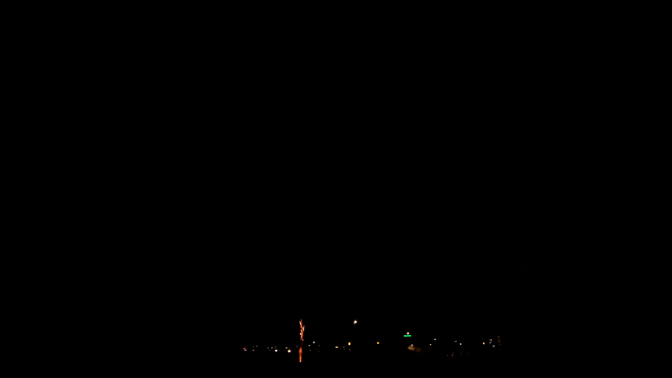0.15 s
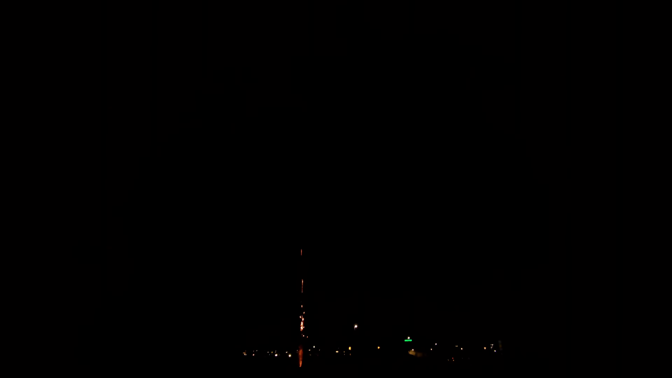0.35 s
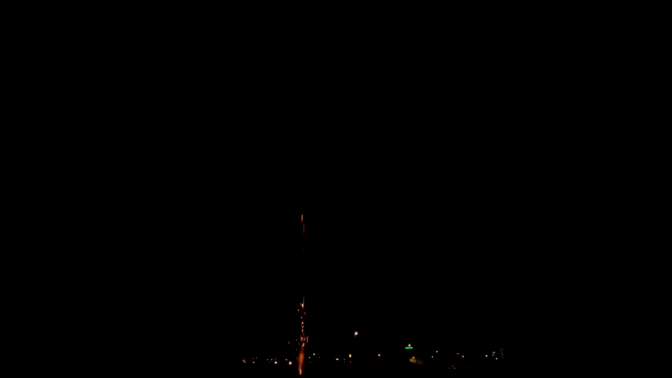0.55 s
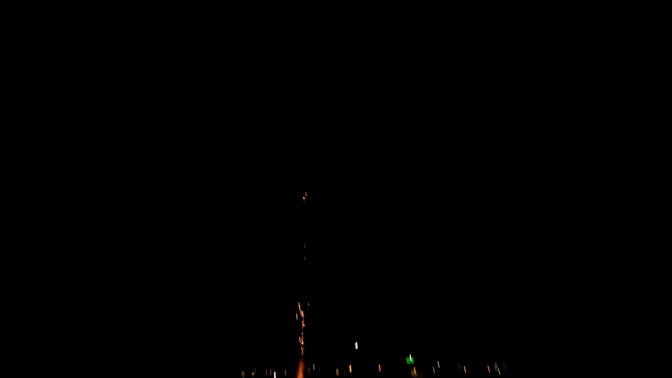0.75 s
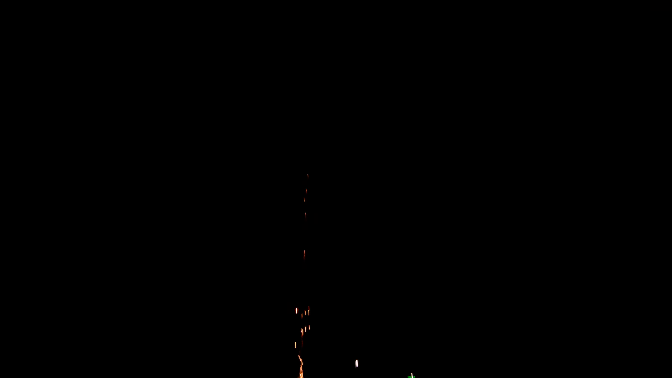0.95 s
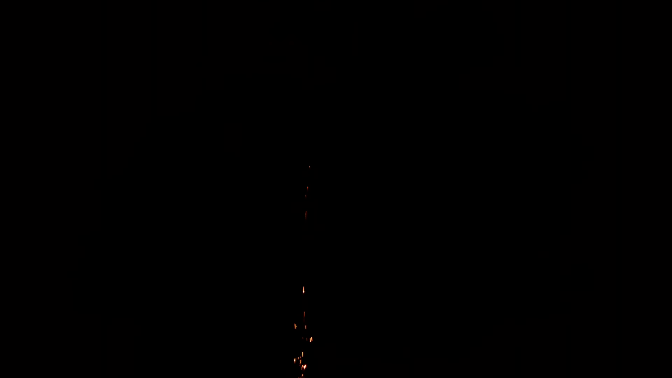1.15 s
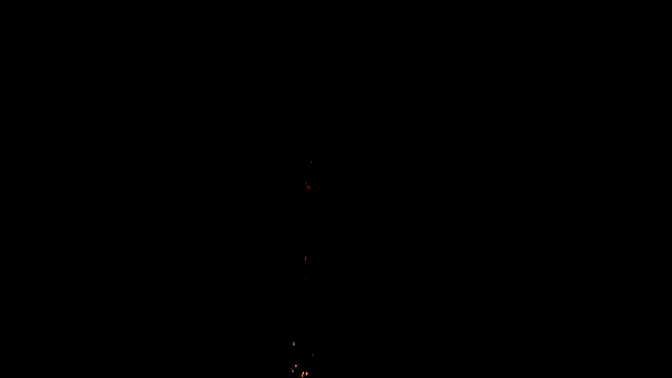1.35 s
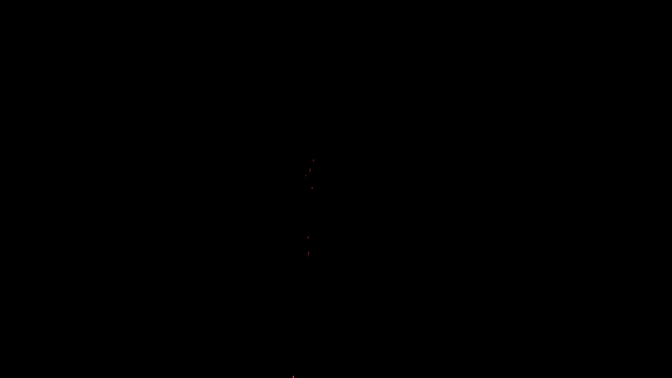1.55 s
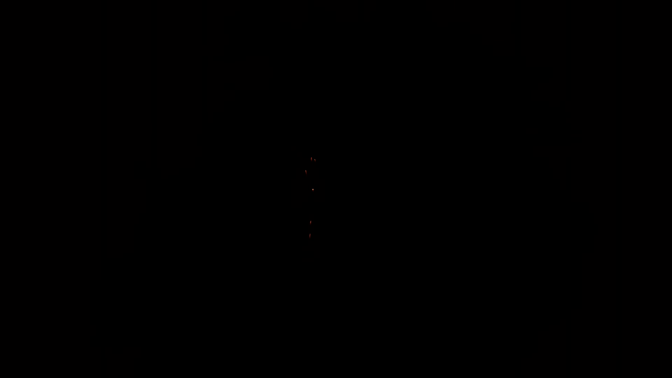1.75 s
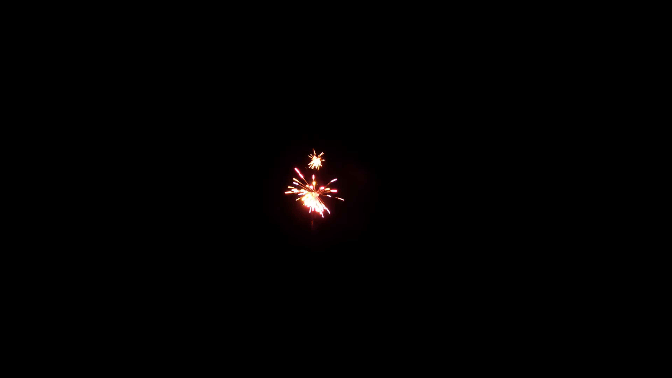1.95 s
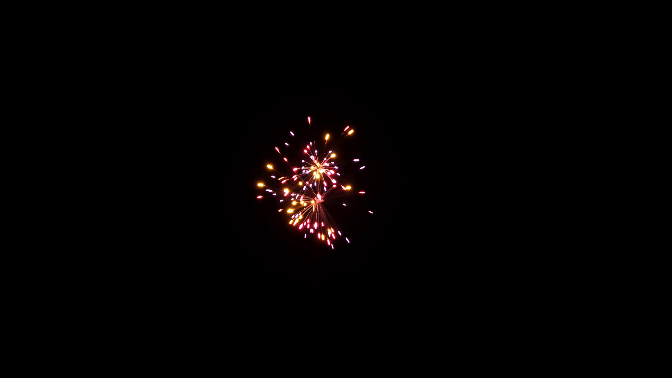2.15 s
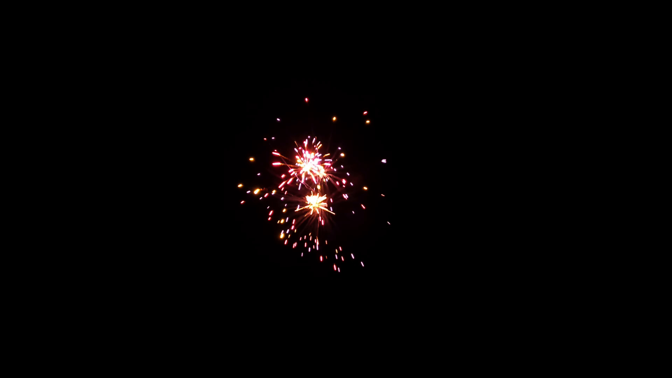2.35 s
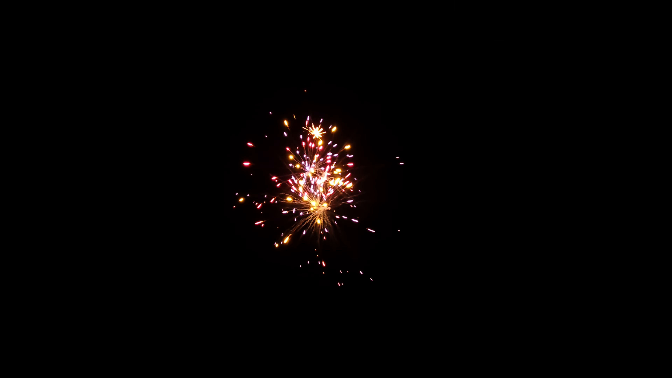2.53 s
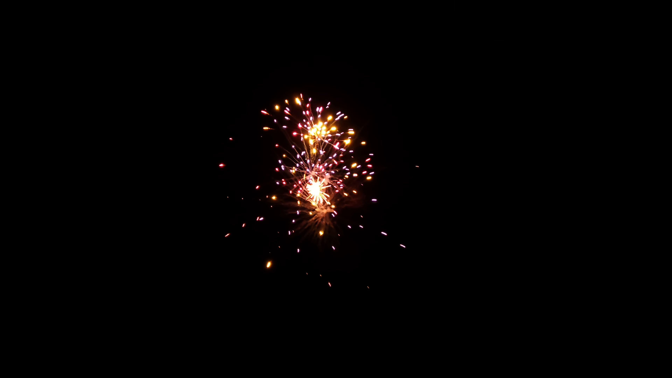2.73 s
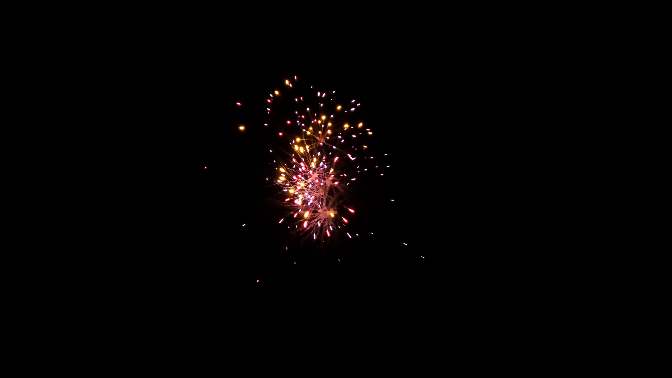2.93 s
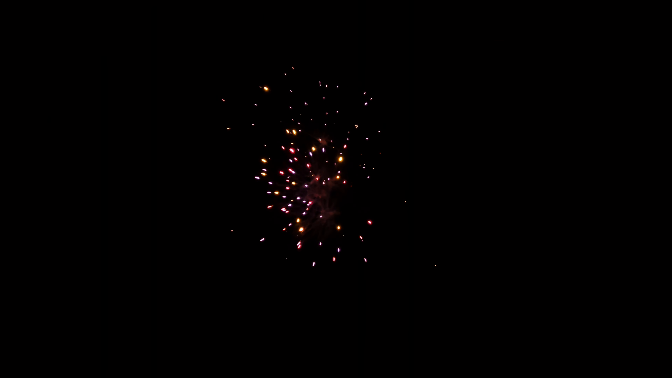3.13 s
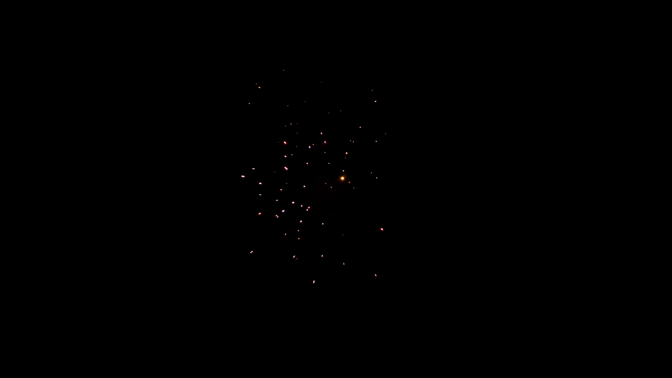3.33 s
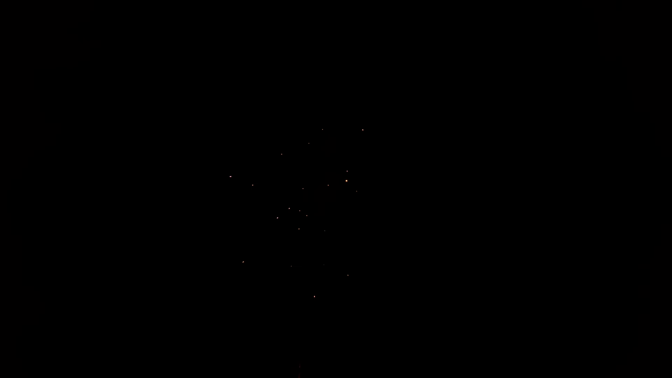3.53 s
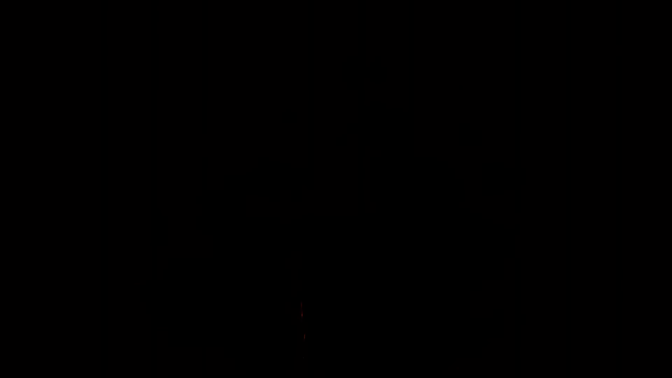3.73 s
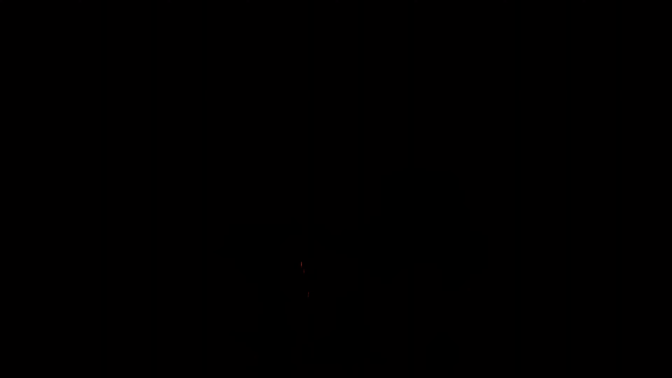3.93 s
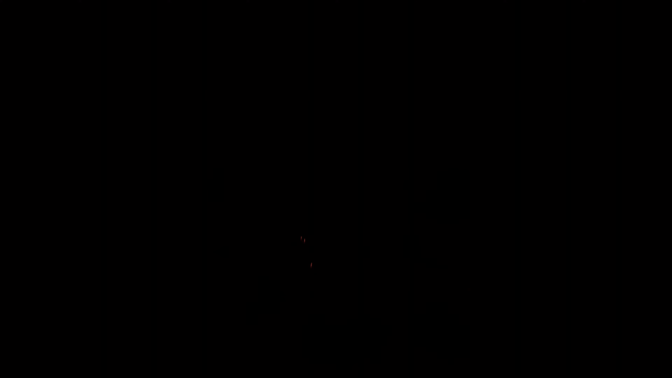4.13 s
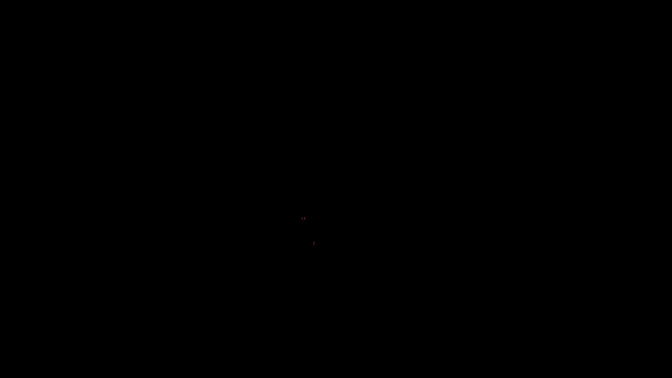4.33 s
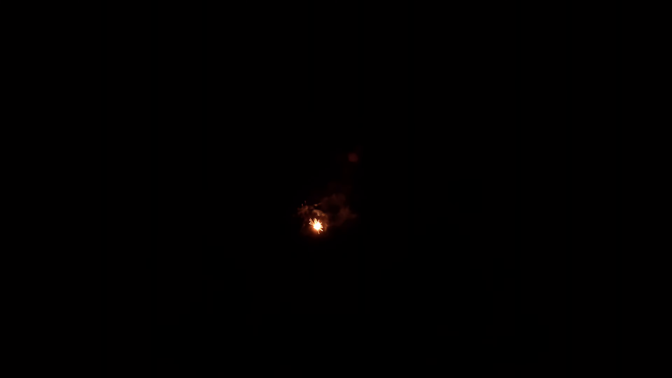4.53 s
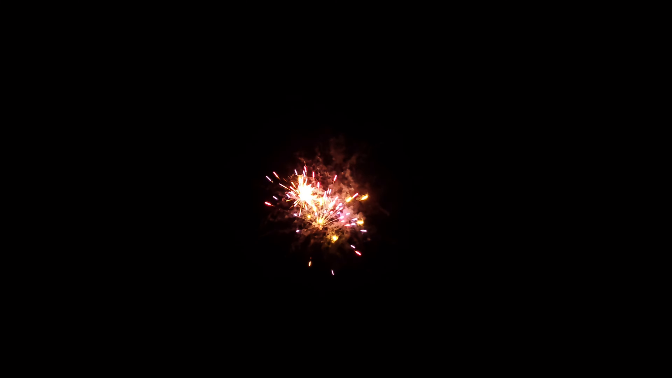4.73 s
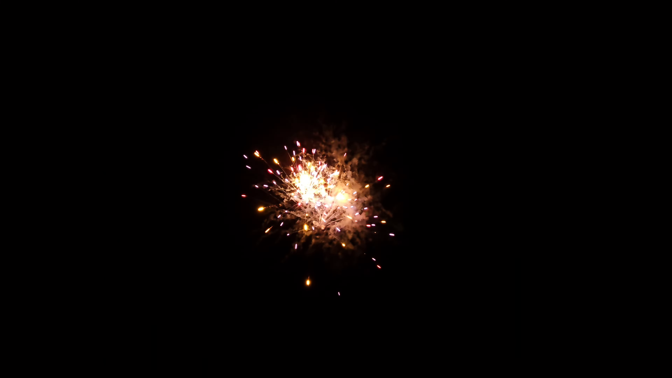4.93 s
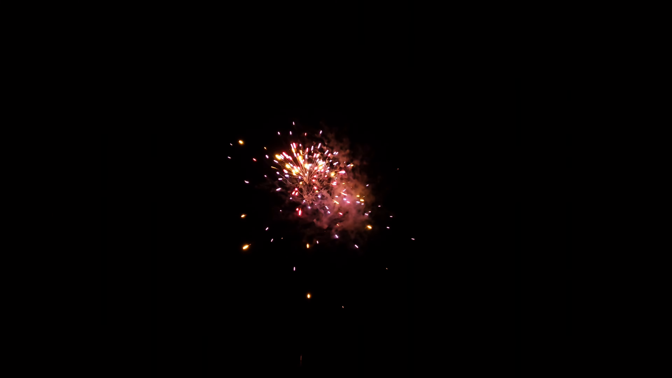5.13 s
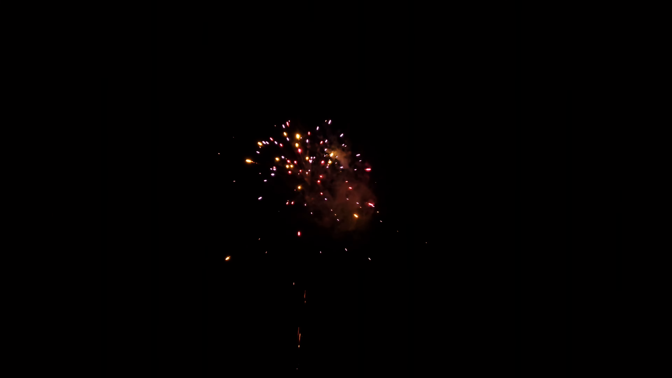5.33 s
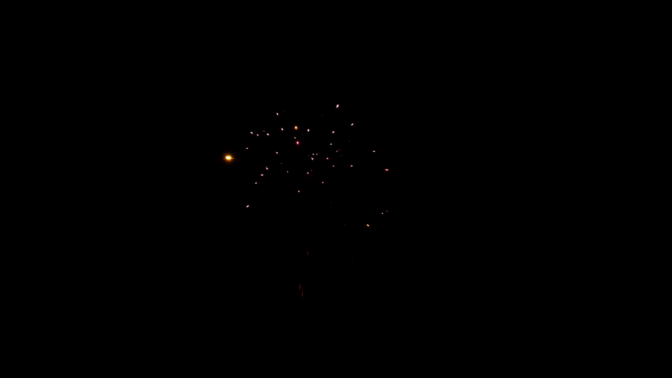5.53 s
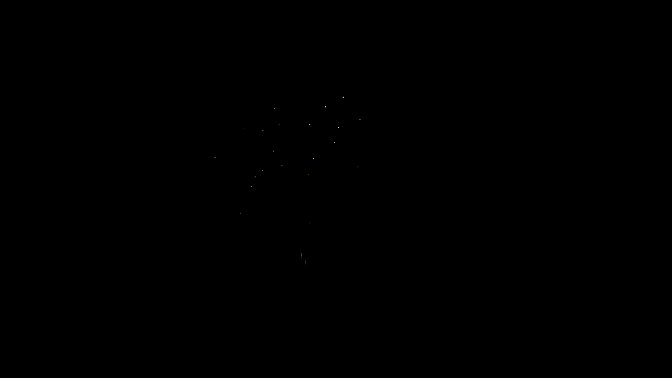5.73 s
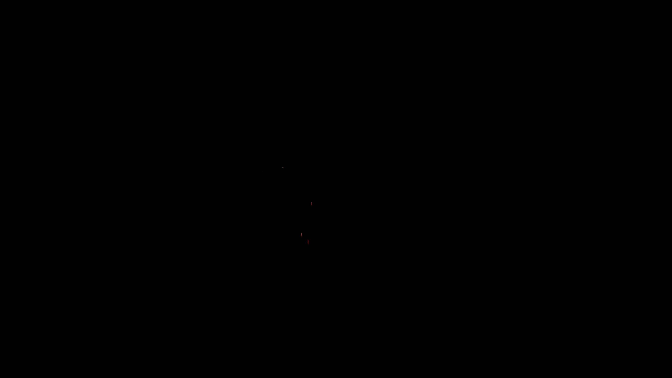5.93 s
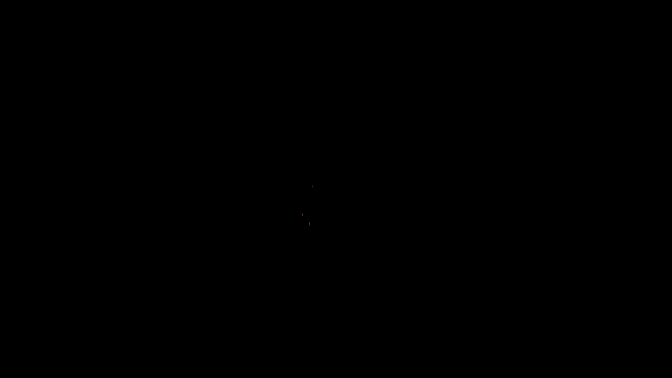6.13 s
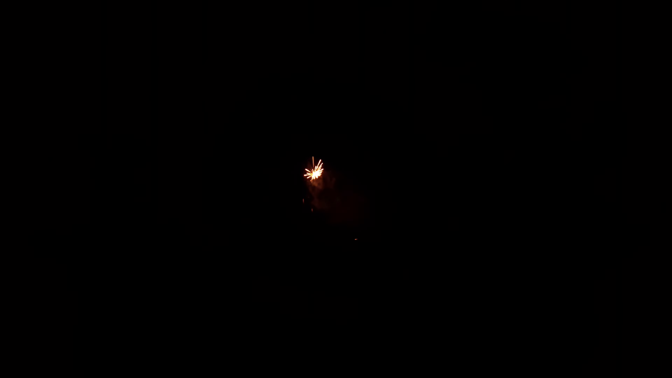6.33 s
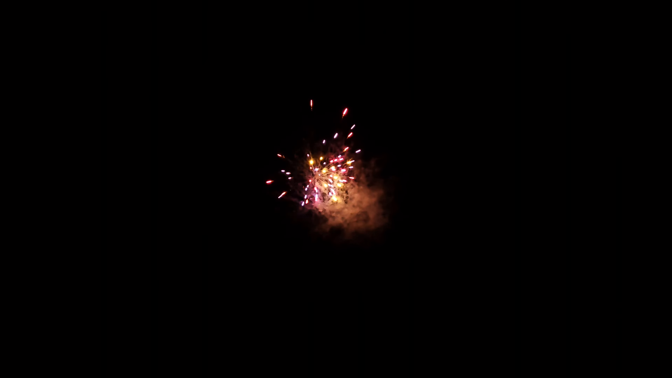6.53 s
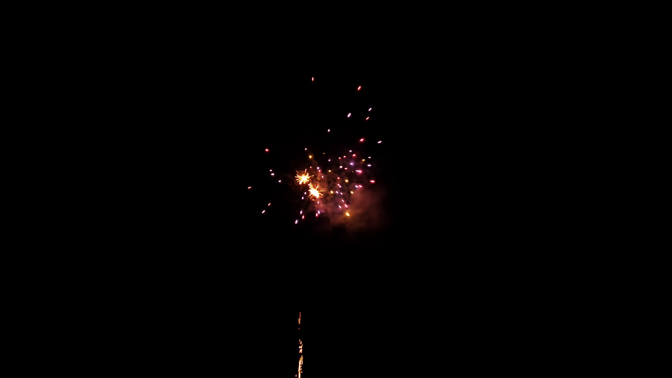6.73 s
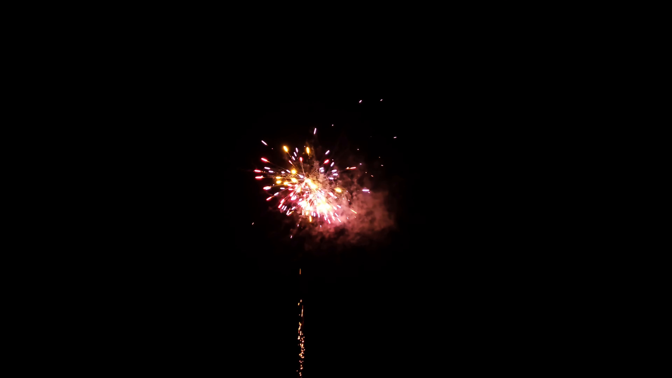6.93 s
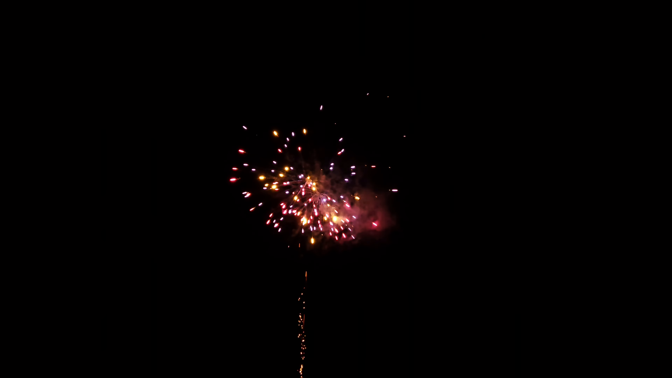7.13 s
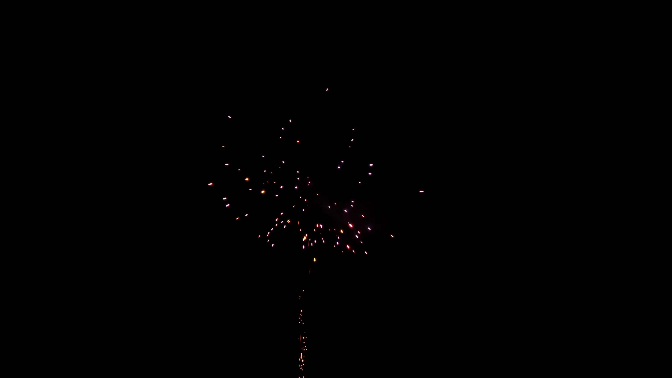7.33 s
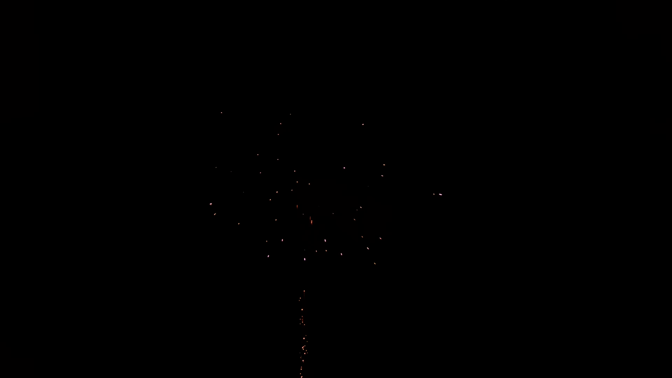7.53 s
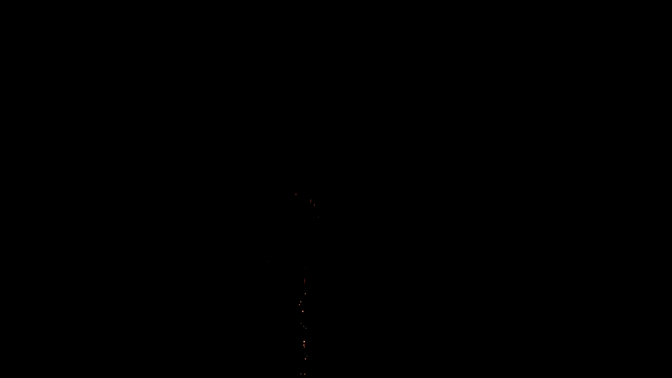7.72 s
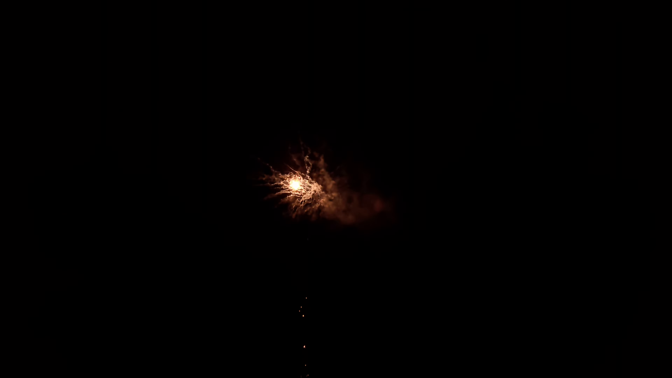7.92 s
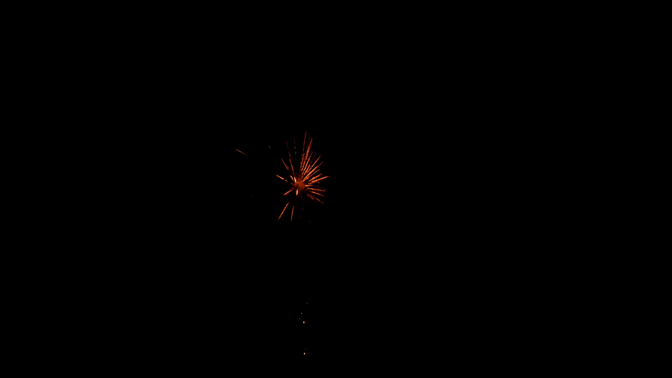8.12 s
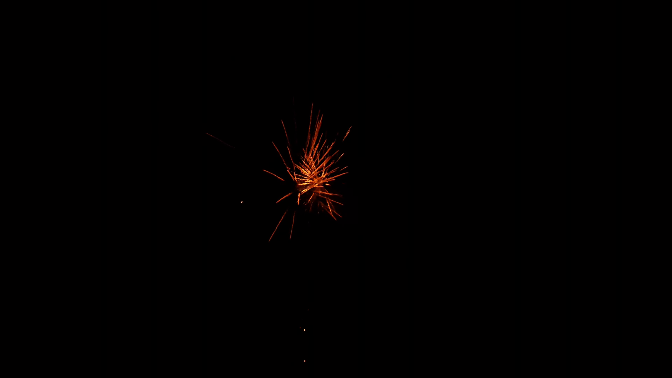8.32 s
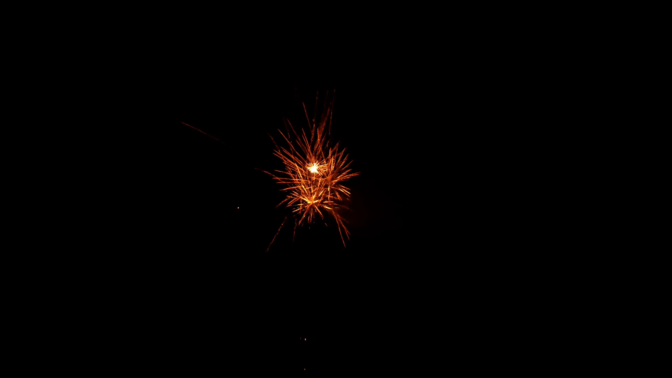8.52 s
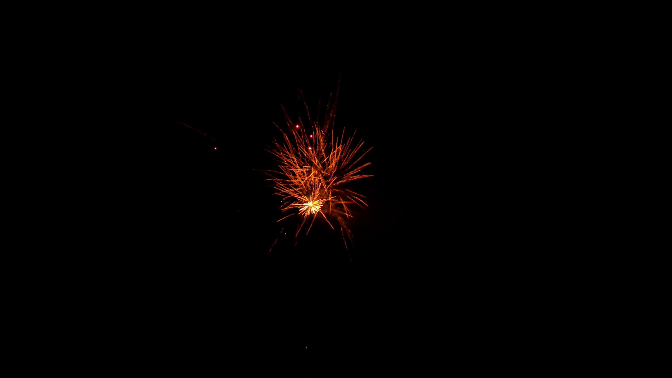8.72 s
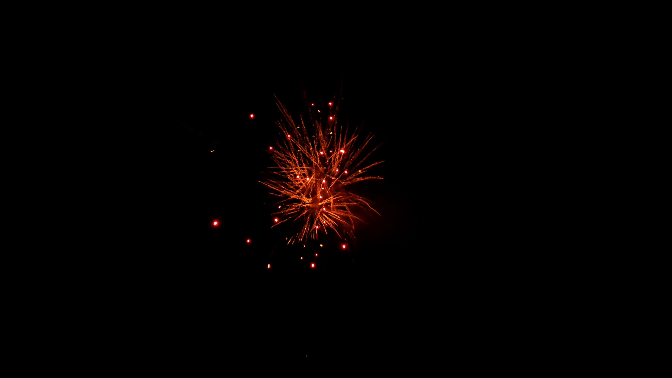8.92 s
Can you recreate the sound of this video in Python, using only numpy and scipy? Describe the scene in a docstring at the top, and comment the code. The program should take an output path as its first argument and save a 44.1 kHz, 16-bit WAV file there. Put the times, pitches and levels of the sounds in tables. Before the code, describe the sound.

A firework cake in an open field: a short spurt, a rapid run of punchy launches slapped back from nearby surfaces, then about a second of decaying echo. Clusters of sharp overhead bangs follow every couple of seconds, the first with the heaviest bass, with weaker launch thumps between and a few faint distant knocks. The stereo microphones catch wide, rolling reverberation and a quiet, dark night background.

```python
"""A firework cake fires in an open field at night, over a faint distant rumble that dies away.
Powder ignites with a spurt (noise fading band by band), then a volley of mortars thumps from the ground:
each launch is a muzzle crack and a hollow pulse, slapped back from nearby surfaces.
Shells then burst overhead in volleys, among more launches: a blast wave, its ground reflection and a boom.
The bangs scatter close by and roll away over the land; a few faint knocks come from far off later on."""
import sys
import numpy as np
from scipy import signal
from scipy.fft import rfft, irfft, next_fast_len
from scipy.io import wavfile

SR = 44100
rng = np.random.default_rng(int(sys.argv[2]) if len(sys.argv) > 2 else 0)


def store_wav(level_fs):
    """Save 16-bit WAV to argv[1]."""
    pcm = np.round(np.clip(np.atleast_2d(level_fs), -1, 1) * 32767)
    wavfile.write(sys.argv[1], SR, pcm.T.astype(np.int16))


N = 395577

BAND_EDGES = 20 * 2 ** (np.arange(30) / 3)  # thirds of an octave from 20 Hz [Hz]
# spectrum of the low rumble in the air: frequency_hz, relative_level_db (per Hz)
RUMBLE_SPECTRUM = [(20, -9), (55, -1.5), (110, -9.5), (300, -32.5), (1000, -67.5)]


def amp(db):
    """Decibels to gain."""
    return 10 ** (np.asarray(db) / 20)


def at_hz(points, hz):
    """Read a table on a log-frequency axis."""
    table_hz, value = np.transpose(points)
    return np.interp(np.log(np.maximum(hz, 1)), np.log(table_hz), value)


def clicks(times_s, level_db):
    """One impulse per event."""
    train = np.zeros(N)
    index = np.round(np.asarray(times_s) * SR).astype(int)
    np.add.at(train, np.clip(index, 0, N - 1), amp(level_db))
    return train


def echoed(x, echoes):
    """The sum of delayed copies, without the original; echoes are (lag_s, level_db)."""
    return sum(amp(db) * np.pad(x, (int(lag_s * SR), 0))[:N] for lag_s, db in echoes)


def pulses(train, spectrum, size=8192):
    """Each impulse becomes a causal pressure pulse, front first; 0 dB is unit power over 5 ms."""
    bin_hz = np.arange(size // 2 + 1) * SR / size
    cepstrum = irfft(np.log(amp(at_hz(spectrum, bin_hz))))
    # folding the cepstrum gives minimum phase: the energy comes as early as it can
    shape = irfft(np.exp(rfft(2 * cepstrum[:size // 2], size)))[:size // 2]
    shape = shape * np.sqrt(.005 * SR / np.sum(shape ** 2))
    return signal.oaconvolve(train, shape)[:N]


def reflectors(x, per_s, level_db, t60, spread_db, size=3 * SR):
    """Single echoes from scattered trees and buildings, ahead and to each side, weaker the later they come."""
    t = np.arange(size) / SR
    present = rng.random((3, size)) < per_s / SR
    strength = amp(spread_db * np.clip(rng.standard_normal((3, size)), -2, 2))
    strength = strength / np.sqrt(np.mean(strength ** 2) * .005 * per_s)
    strength = strength * rng.choice([-1, 1], (3, size))
    fade = amp(level_db - 60 * t / t60) * (t > .012)  # no echo comes within 12 ms
    ahead, left, right = present * strength * fade
    sides = np.array([ahead + left, ahead + right]) / np.sqrt(2)
    return signal.oaconvolve(x[None], sides, axes=1)[:, :N]


def band_share(spectrum):
    """The part of the power that falls in each third of an octave, as a column."""
    centre_hz = np.sqrt(BAND_EDGES[1:] * BAND_EDGES[:-1])
    power = amp(at_hz(spectrum, centre_hz)) ** 2 * np.diff(BAND_EDGES)
    return (power / power.sum())[:, None]


def tail(train, spectrum, level_db, bass_t60, treble_t60):
    """Power by band of the scatter after each impulse, losing 60 dB in its own t60 [s] in each band."""
    t60 = np.geomspace(bass_t60, treble_t60, len(BAND_EDGES) - 1)
    keep = amp(-60 / (t60 * SR)) ** 2  # power kept from one sample to the next
    power = (train * amp(level_db)) ** 2 + 1e-18
    bands = [signal.lfilter(share, [1, -k], power) for share, k in zip(band_share(spectrum), keep)]
    return np.array(bands, np.float32)


def scatter(power, bass_patchy_db, treble_patchy_db, flutter_db, patches_per_s):
    """Stereo noise with the given power by band; uneven terrain makes it flutter, together and band by band."""
    # left-right likeness of scattered sound: frequency_hz, correlation (-1 to 1)
    likeness = [(30, 0.013), (120, 1), (300, 0.14), (480, 0.7), (750, -0.44), (1300, 0.023), (3000, -0.051)]
    size = next_fast_len(N, True)
    bin_hz = np.maximum(np.arange(size // 2 + 1) * SR / size, 1)
    thirds = 3 * np.log2(bin_hz / BAND_EDGES[0]).astype(np.float32)
    white = rfft(rng.standard_normal((2, size)).astype(np.float32))
    out = np.zeros((2, N))
    t, knots_s = np.arange(N) / SR, np.arange(900) / patches_per_s
    flutter = flutter_db * rng.standard_normal(len(knots_s))
    patchy_db = np.linspace(bass_patchy_db, treble_patchy_db, len(BAND_EDGES) - 1)
    for k, (low, width) in enumerate(zip(BAND_EDGES, np.diff(BAND_EDGES))):
        overlap = np.maximum(1 - abs(thirds - k - .5), 0)  # triangular band
        mid, side = irfft(white * overlap, size)[:, :N] * np.sqrt(SR / 4 / width)
        alike = np.clip(at_hz(likeness, low + width / 2), -1, 1)
        patches = amp(flutter + patchy_db[k] * rng.standard_normal(len(knots_s)))
        gain = np.sqrt(power[k]) * np.interp(t, knots_s, patches)
        out += gain * (np.sqrt(1 + alike) * mid + np.sqrt(1 - alike) * side * [[1], [-1]])
    return out


def night_air():
    """Steady, mostly low background noise of the field: its power by band."""
    # spectrum of the night: frequency_hz, relative_level_db (per Hz)
    night = [(13, -50), (22, -30.5), (49, -5.5), (103, -7), (211, -22), (263, -19.5), (302, -24.5),
             (457, -11), (815, -24), (1200, -28), (1580, -23.5), (2140, -31.5), (2390, -32), (2900, -33.5),
             (16000, -78.5)]
    level_db = -59
    return (amp(level_db) ** 2 * band_share(night)).astype(np.float32)


def fading_rumble():
    """Low rumble in the air, left by earlier shots and dying away steadily: its power by band."""
    start_db, fade_db_per_s = -46.5, 3.5
    level_db = start_db - fade_db_per_s * np.arange(N) / SR
    return (amp(level_db) ** 2).astype(np.float32) * band_share(RUMBLE_SPECTRUM).astype(np.float32)


def far_knocks():
    """Faint far-off knocks, each a single pressure pulse."""
    # knocks: start_s, level_db
    knock_events = [(5.913, -52.5), (5.996, -53.5), (7.684, -56.5)]
    # their spectrum: frequency_hz, relative_level_db (per Hz)
    knock_spectrum = [(200, -21), (650, 7), (1000, -15), (5500, -31), (9000, -50)]
    return pulses(clicks(*np.transpose(knock_events)), knock_spectrum)


def powder_spurts():
    """Igniting powder puffs out as noise whose bass outlasts its treble: its power by band."""
    # spurts: start_s, relative_level_db
    spurt_events = [(0.125, -29.5)]
    # their spectrum: frequency_hz, relative_level_db (per Hz)
    spurt_spectrum = [(30, -6.5), (100, 1.5), (200, -12.5), (600, -31), (2400, -24), (6000, -19.5),
                      (10000, -39), (16000, -46)]
    train = clicks(*np.transpose(spurt_events))
    return tail(train, spurt_spectrum, level_db=-3.0, bass_t60=0.45, treble_t60=0.26)


def launches():
    """Lift charges: a muzzle crack and the tube's hollow thump, slapped back; direct sound and scatter power."""
    # mortar launches: start_s, relative_thump_level_db
    launch_events = [(0.2061, -1.5), (0.377, -2.5), (0.6066, -3), (0.8359, -3.5), (0.9851, -8.5),
                     (1.061, -6.5), (3.4073, -19), (3.4318, -22.5), (3.4487, -19.5), (5.055, -17.5),
                     (5.083, -28), (5.1059, -23), (6.7631, -19), (6.9224, -17.5), (7.0787, -28.5),
                     (7.2257, -26.5)]
    # small sharp pops on the ground: start_s, relative_level_db
    pop_events = [(6.619, -44.5)]
    # echoes of sounds at ground level: lag_s, relative_level_db
    ground_echoes = [(0.0147, -11.5), (0.0211, -11.5), (0.023, -7.5), (0.0353, -11), (.046, -12),
                     (0.115, -28), (.332, -26.5)]
    # spectra of thump, crack, near and far scatter: frequency_hz, relative_level_db (per Hz)
    thump_spectrum = [(25, -30.5), (55, -15.5), (90, -2), (140, 1), (195, -1), (270, 4.5), (340, -3.5),
                      (430, -25.5), (600, -27.5), (1100, -25), (2500, -34), (8000, -80.5)]
    crack_spectrum = [(200, -15.5), (800, 2.5), (2000, 4), (4000, -0.5), (6500, -6.5), (9500, -22.5),
                      (16000, -31)]
    near_spectrum = [(25, -18.5), (70, -11.5), (120, 3), (270, -3), (400, -19.5), (700, -37), (2000, -43)]
    far_spectrum = [(25, -8), (60, 1.5), (110, 0.5), (250, -10), (450, -17), (900, -27), (1700, -20.5),
                    (3500, -27), (6000, -38), (10000, -63), (16000, -59)]

    start_s, thump_db = np.transpose(launch_events)
    crack_db = thump_db - 18.5  # the muzzle crack grows with the thump
    thumps = clicks(start_s, thump_db)
    cracks = clicks(start_s, crack_db) + clicks(*np.transpose(pop_events))
    # a second puff escapes as the shell clears the muzzle, never at quite the same moment
    puff_lag_s, puff_db = rng.uniform(0.00031, .0012, len(start_s)), -4.5
    cracks = cracks + clicks(start_s + puff_lag_s, crack_db + puff_db)
    cracks = cracks + echoed(cracks, ground_echoes)

    thump_gain_db, thump_echo_db, crack_gain_db = -.6, -10, -1.5
    slapped_thumps = thumps + amp(thump_echo_db) * echoed(thumps, ground_echoes)
    direct = amp(thump_gain_db) * pulses(slapped_thumps, thump_spectrum)
    snaps = amp(crack_gain_db) * pulses(cracks, crack_spectrum)
    direct = direct + snaps + reflectors(snaps, per_s=200, level_db=-10.5, t60=0.098, spread_db=6.0)

    power = tail(cracks, crack_spectrum, level_db=-5, bass_t60=0.049, treble_t60=0.039)
    power += tail(cracks, crack_spectrum, level_db=-11, bass_t60=0.16, treble_t60=0.15)
    power += tail(thumps, near_spectrum, level_db=-17.0, bass_t60=0.47, treble_t60=0.14)
    power += tail(thumps, far_spectrum, level_db=-45.0, bass_t60=5.0, treble_t60=5.1)
    return direct, power


def volley_scatter_db(burst_s):
    """Scatter level of bursts: strongest as a volley opens, then sagging with the root of the time."""
    # volleys of shells: start_s, relative_opening_scatter_db
    volley_events = [(2.05, -15), (4.67, -16), (6.48, -20), (8.09, -21.5)]
    sag_db = 12  # lost one second into a volley
    start_s, opening_db = np.transpose(volley_events)
    volley = np.maximum(np.searchsorted(start_s, burst_s) - 1, 0)
    return opening_db[volley] - sag_db * np.sqrt(np.abs(burst_s - start_s[volley]))


def blast_level_db(burst_s, boom_db):
    """Level of each front: about equally loud, but those with the strongest boom are set softer."""
    first_db, fade_db_per_s = -11.5, 0.1878  # the later ones arrive a little weaker
    strong_boom_db, softening = -18.5, 1.8  # boom level where softening starts; dB lost per dB above it
    return first_db - fade_db_per_s * burst_s - softening * np.maximum(boom_db - strong_boom_db, 0)


def bursts():
    """Shells overhead: blast, duller ground reflection, boom and rolling echoes; direct sound and scatter power."""
    # shell bursts: start_s, ground_reflection_lag_s, relative_boom_level_db
    burst_events = [(2.0778, 0.0044, -14.5), (2.0821, 0.004, -24.5), (2.1736, 0.0046, -21),
                    (2.4848, 0.0047, -47), (2.541, 0.0043, -51), (2.748, 0.0051, -35), (2.911, 0.0045, -48),
                    (4.7013, 0.0041, -18.5), (4.8953, 0.0046, -54), (5.1759, 0.0046, -42.5),
                    (6.5082, 0.0048, -21.5), (6.9412, 0.005, -54), (6.9437, 0.0049, -29.5),
                    (8.117, 0.0046, -21), (8.3641, 0.0047, -48.5), (8.5872, 0.0045, -32.5),
                    (8.6032, 0.0046, -51), (8.7527, 0.005, -26), (8.9334, 0.0042, -58)]
    # spectra of the pressure pulses: frequency_hz, relative_level_db (per Hz)
    blast_spectrum = [(40, -25.5), (120, -23), (190, -12), (260, 1), (420, 0.5), (650, -1.5), (950, -14),
                      (1400, -11), (2200, -25), (4500, -26.5), (7500, -32), (9000, -48.5), (16000, -40.5)]
    slap_spectrum = [(500, -29.5), (3000, -10), (4200, 16), (5200, -15), (10000, -31.5)]
    boom_spectrum = [(20, -7.5), (55, 3), (110, 2.5), (200, -3.5), (400, -12), (1200, -41.5)]
    depth_spectrum = [(20, 3.5), (45, 3), (75, 4.5), (130, -12.5), (400, -55)]
    roll_spectrum = [(100, -14.5), (230, 0), (480, 1.5), (680, -7), (1000, -32.5), (2100, -13), (3000, -34),
                     (9000, -59.5)]
    # spectra of the scattered sound: frequency_hz, relative_level_db (per Hz)
    sizzle_spectrum = [(300, 3), (1000, 6.5), (2500, -1.5), (6500, -6), (9000, -17), (16000, -14)]
    near_spectrum = [(30, -14), (120, -24.5), (240, 0), (330, -1.5), (480, 5.5), (680, -10), (1000, -24.5),
                     (1500, -19), (3000, -24.5), (7000, -30), (9500, -41), (16000, -37.5)]
    far_spectrum = [(30, -7.5), (100, 7.5), (215, 5), (320, -11.5), (450, -1.5), (680, -23), (1000, -33.5),
                    (1450, -17.5), (2100, -21.5), (2800, -18), (4200, -21.5), (7500, -38.5), (11000, -54.5)]

    start_s, ground_lag_s, boom_db = np.transpose(burst_events)
    blast_db, scatter_db = blast_level_db(start_s, boom_db), volley_scatter_db(start_s)
    fronts, booms, spread = clicks(start_s, blast_db), clicks(start_s, boom_db), clicks(start_s, scatter_db)
    ground_cut_hz, ground_db, blast_gain_db = 4500, -2.5, 1.5
    reflected = clicks(start_s + ground_lag_s, blast_db + ground_db)
    reflected = signal.lfilter(*signal.butter(1, ground_cut_hz, fs=SR), reflected)
    direct = amp(blast_gain_db) * pulses(fronts + reflected, blast_spectrum)
    direct = direct + pulses(echoed(fronts, [(.3105, -48.5)]), slap_spectrum)  # one late, bright slap
    # the boom starts with the front, with opposite sign; it is stronger on the right
    boom_sides_db = [[-4.0], [2.5]]
    direct = direct - amp(boom_sides_db) * pulses(booms, boom_spectrum)
    # only the heaviest shells reach down into the deepest bass: it falls 2 dB per dB of weaker boom
    heavy_db, depth_db, depth_sides_db = -22.0, -23.0, [[-4.0], [2.0]]
    depth = clicks(start_s, depth_db + 2 * np.minimum(boom_db - heavy_db, 0))
    direct = direct - amp(depth_sides_db) * pulses(depth, depth_spectrum)
    # every echo repeats the double pulse, so the roll keeps its hollow colour
    doubled = spread + clicks(start_s + ground_lag_s, scatter_db)
    near_pulses, roll_pulses = pulses(doubled, near_spectrum), pulses(doubled, roll_spectrum)
    direct = direct + reflectors(near_pulses, per_s=490, level_db=-14.0, t60=0.31, spread_db=4.0)
    direct = direct + reflectors(roll_pulses, per_s=77, level_db=-37.5, t60=5.16, spread_db=4.5)

    sizzling = fronts + echoed(fronts, [(.005, -4.5)])
    power = tail(sizzling, sizzle_spectrum, level_db=-11.5, bass_t60=0.07, treble_t60=0.061)
    # the close scatter swells a little after each blast
    delayed_spread = echoed(spread, [(.016, -4.5)])
    power += tail(delayed_spread, near_spectrum, level_db=-0.5, bass_t60=0.28, treble_t60=0.14)
    power += tail(spread, far_spectrum, level_db=-25.5, bass_t60=0.41, treble_t60=0.36)
    power += tail(fronts, far_spectrum, level_db=-37.5, bass_t60=2.77, treble_t60=3.38)
    power += tail(booms, boom_spectrum, level_db=-14.5, bass_t60=0.067, treble_t60=0.13)
    # each boom feeds the low rumble anew
    power += tail(booms, RUMBLE_SPECTRUM, level_db=-36.5, bass_t60=4.5, treble_t60=3.0)
    return direct, power


def scene():
    """Night and rumble, far knocks, direct bangs, and the scatter of the bangs from all round."""
    ground, ground_power = launches()
    overhead, overhead_power = bursts()
    power = overhead_power + ground_power + powder_spurts() + night_air() + fading_rumble()
    scattered = scatter(power, bass_patchy_db=3.0, treble_patchy_db=2.73, flutter_db=1.13, patches_per_s=27)
    return far_knocks() + ground + overhead + scattered


def record(dry):
    """The two microphone ports colour the treble differently, the highest peaks are rounded, the top is cut."""
    # the two ports: frequency_hz, left_minus_right_db
    ports = [(500, 1), (1000, 0.2), (3300, 0.5), (5500, -2), (8500, -10.5), (12000, -10), (16000, -4)]
    cutoff_hz = 16200
    size = next_fast_len(N + SR, True)
    bin_hz = np.arange(size // 2 + 1) * SR / size
    tilt_db = at_hz(ports, bin_hz) * [[.5], [-.5]]
    heard = irfft(rfft(dry, size) * amp(tilt_db), size)[:, :N]
    rounded = heard / (1 + heard ** 6) ** (1 / 6)
    return signal.sosfilt(signal.ellip(10, .2, 80, cutoff_hz, fs=SR, output="sos"), rounded)


dry = scene()
out = record(dry)
store_wav(out)
```